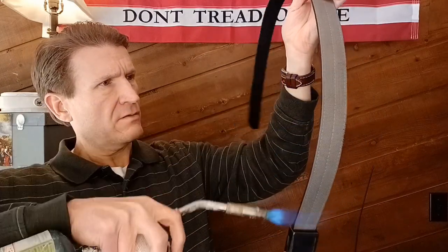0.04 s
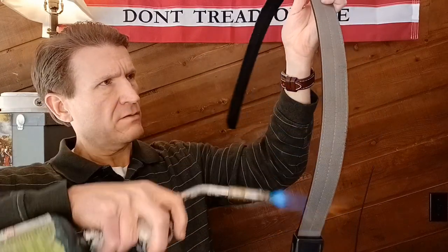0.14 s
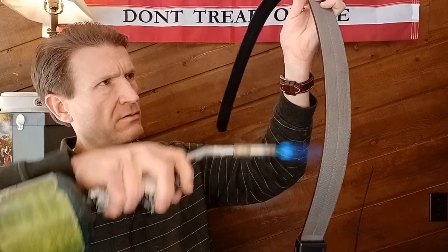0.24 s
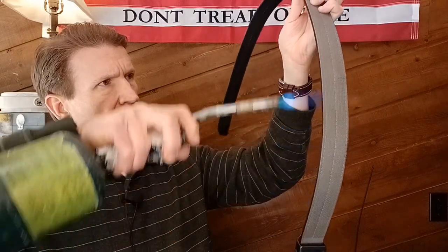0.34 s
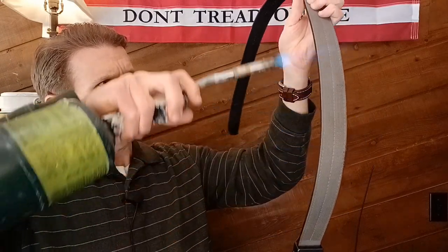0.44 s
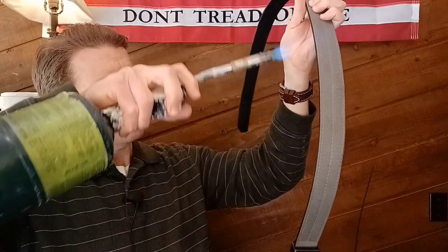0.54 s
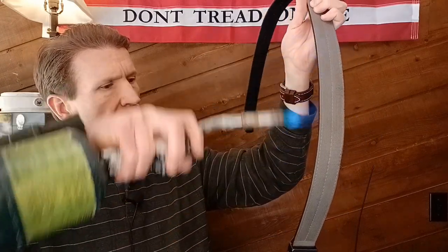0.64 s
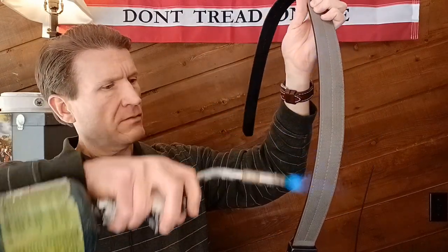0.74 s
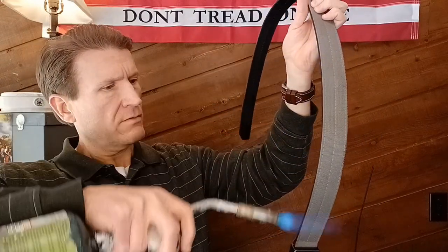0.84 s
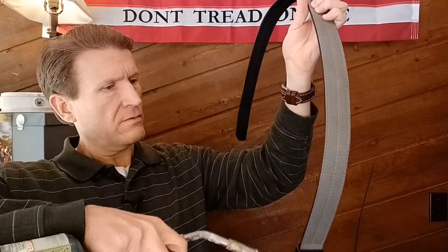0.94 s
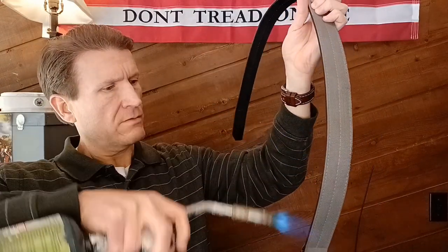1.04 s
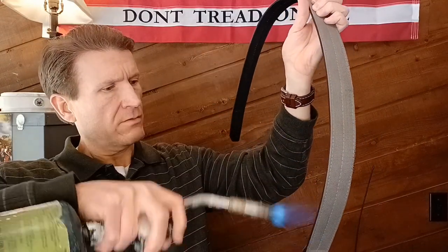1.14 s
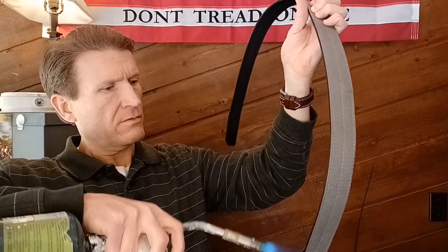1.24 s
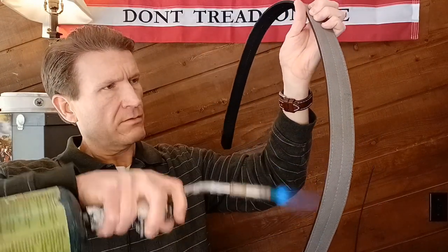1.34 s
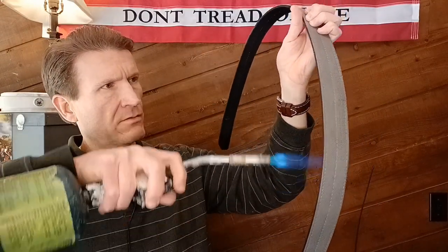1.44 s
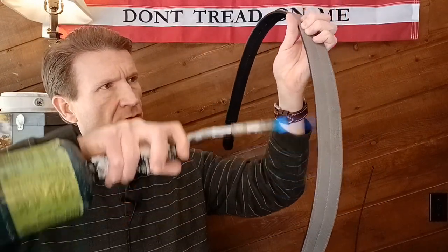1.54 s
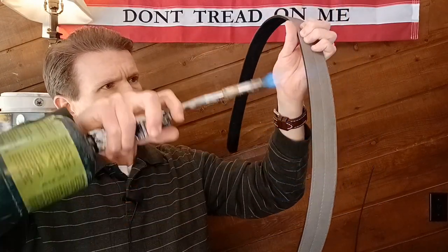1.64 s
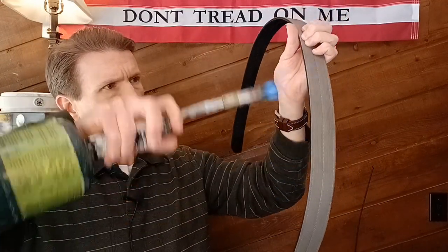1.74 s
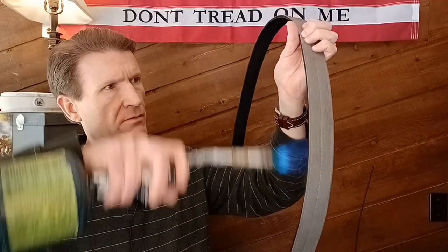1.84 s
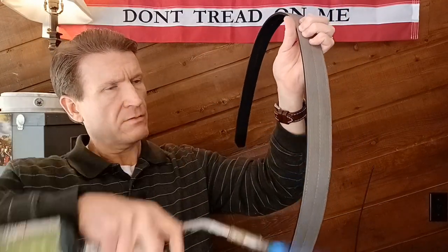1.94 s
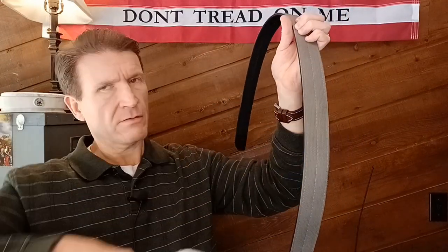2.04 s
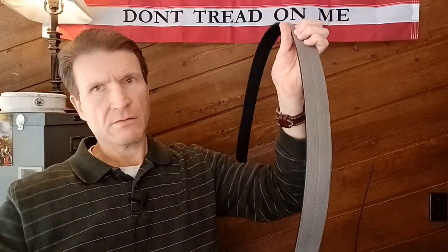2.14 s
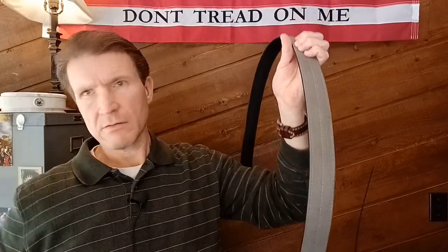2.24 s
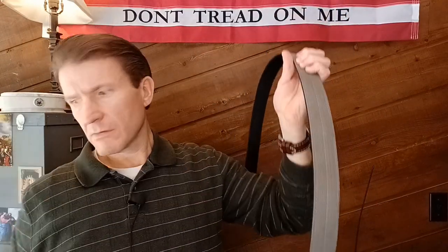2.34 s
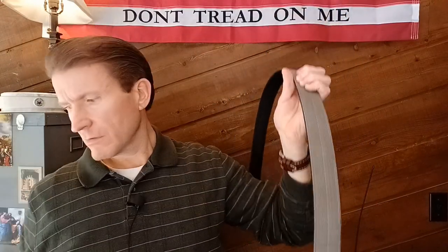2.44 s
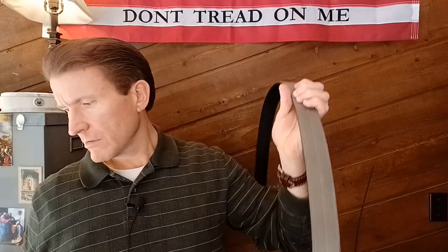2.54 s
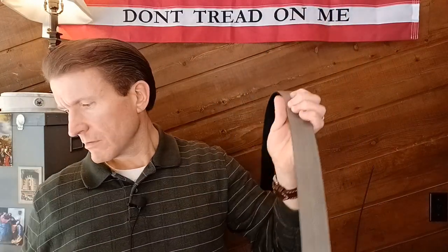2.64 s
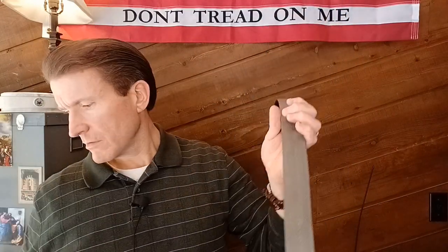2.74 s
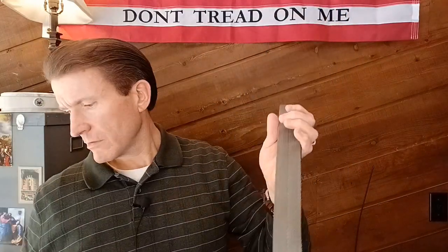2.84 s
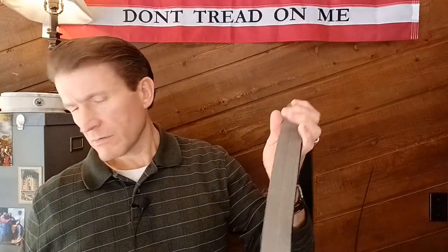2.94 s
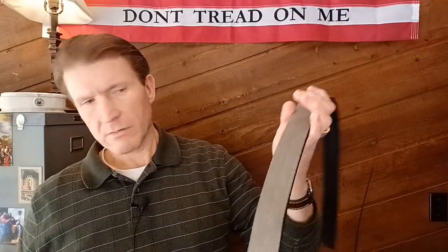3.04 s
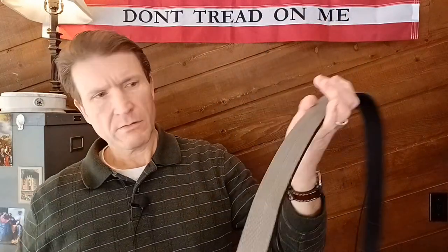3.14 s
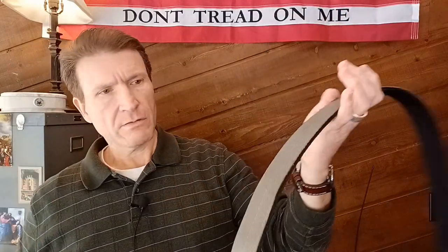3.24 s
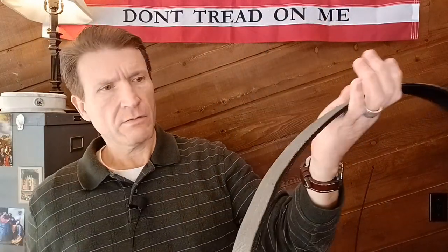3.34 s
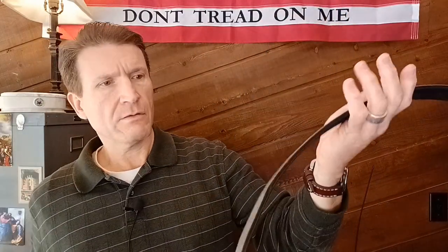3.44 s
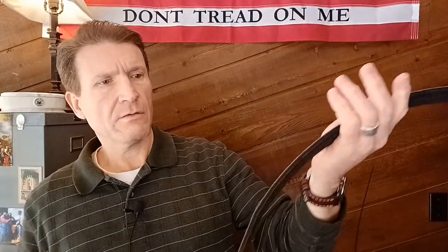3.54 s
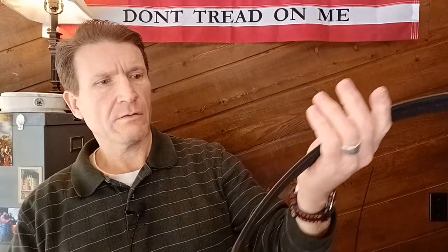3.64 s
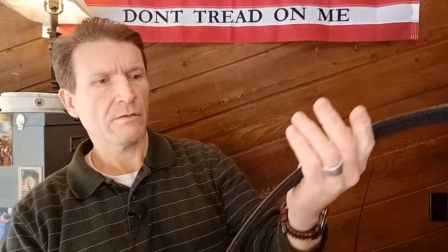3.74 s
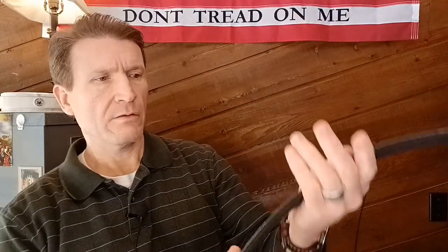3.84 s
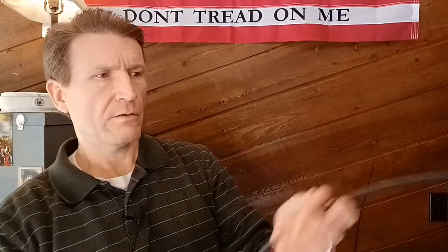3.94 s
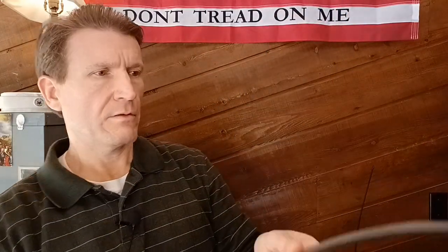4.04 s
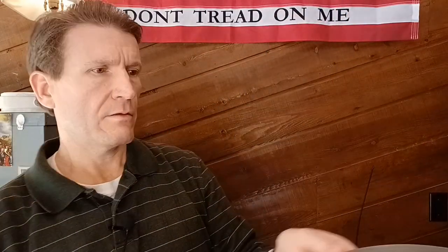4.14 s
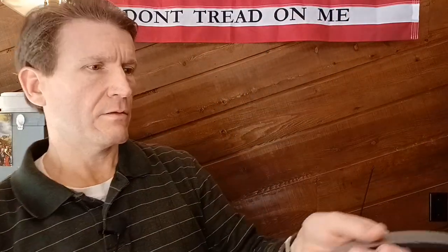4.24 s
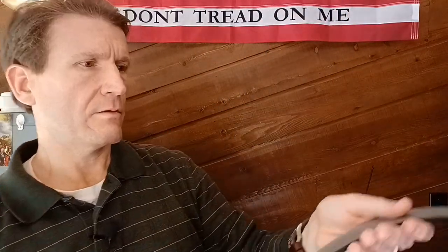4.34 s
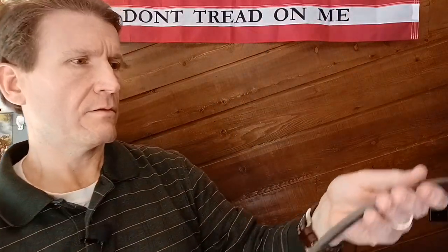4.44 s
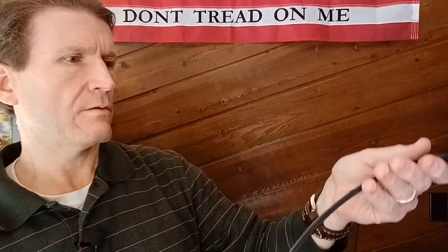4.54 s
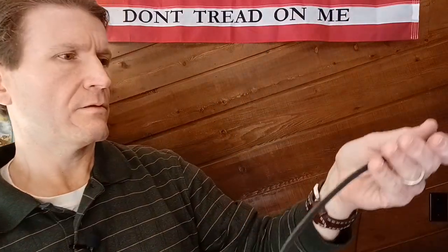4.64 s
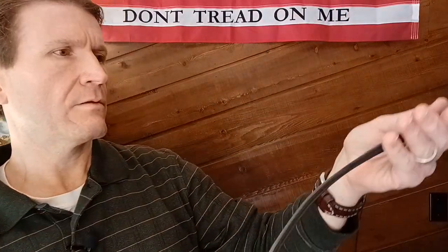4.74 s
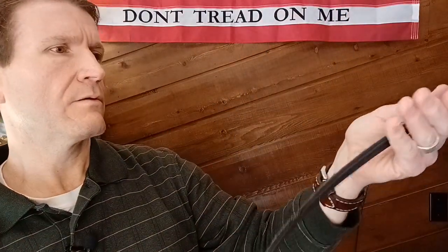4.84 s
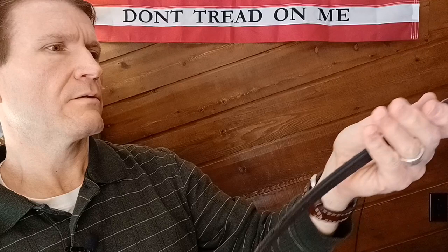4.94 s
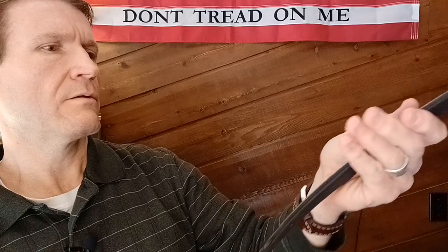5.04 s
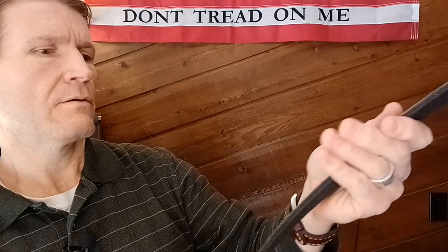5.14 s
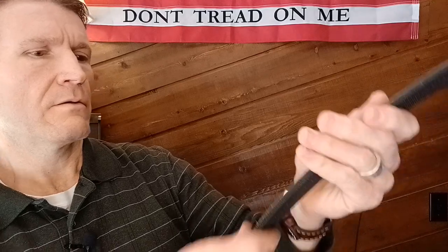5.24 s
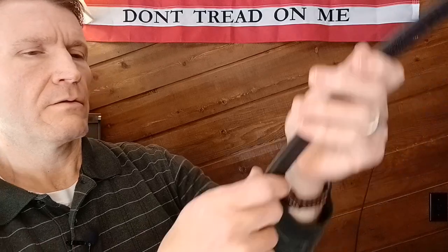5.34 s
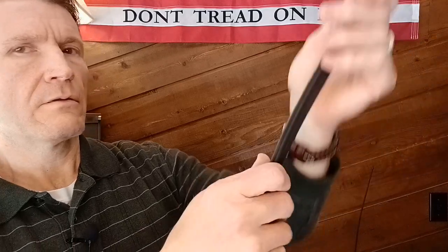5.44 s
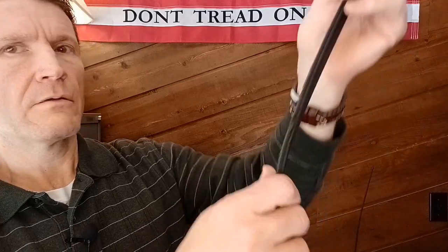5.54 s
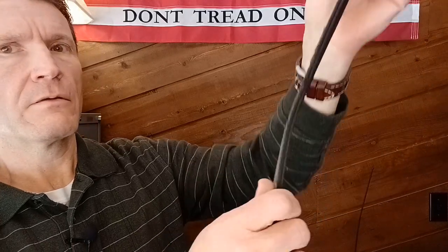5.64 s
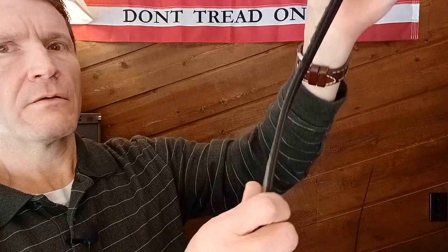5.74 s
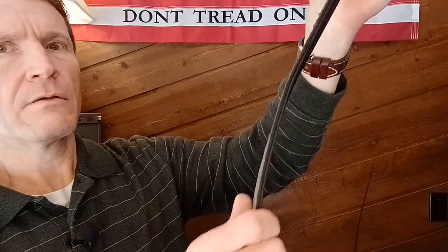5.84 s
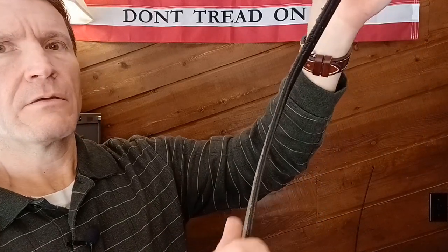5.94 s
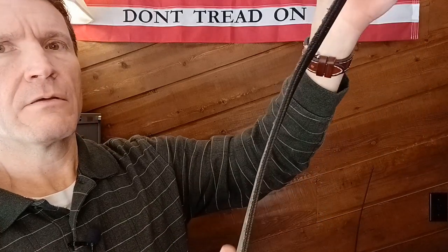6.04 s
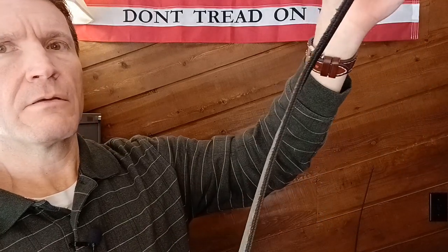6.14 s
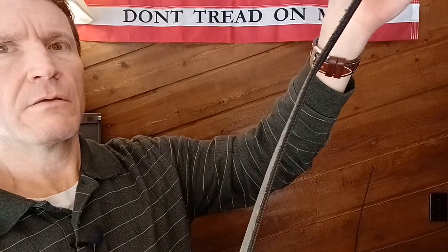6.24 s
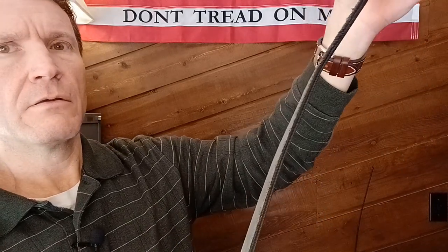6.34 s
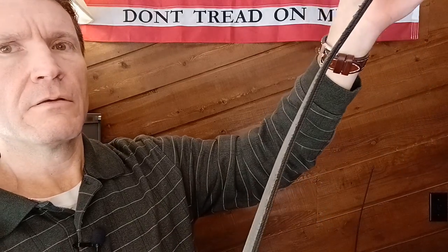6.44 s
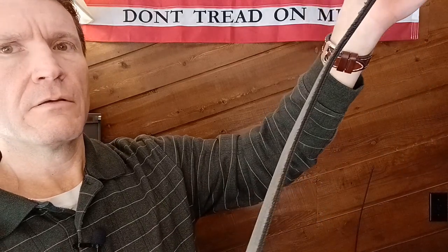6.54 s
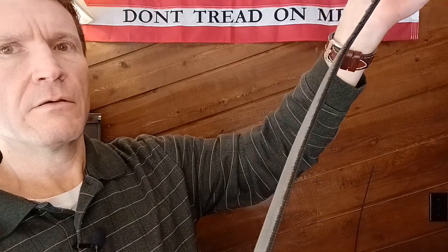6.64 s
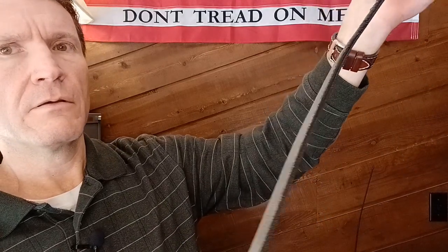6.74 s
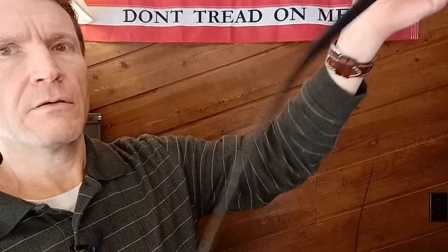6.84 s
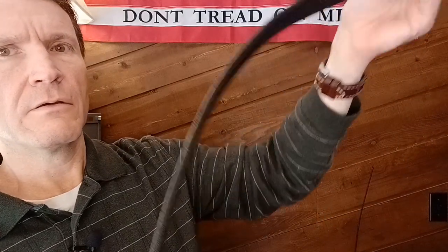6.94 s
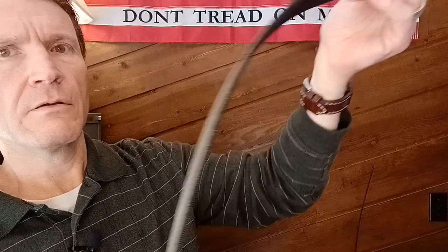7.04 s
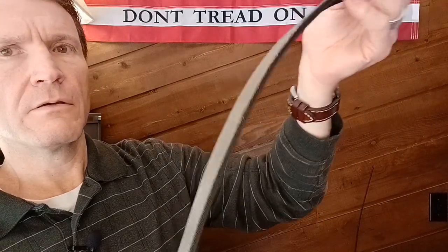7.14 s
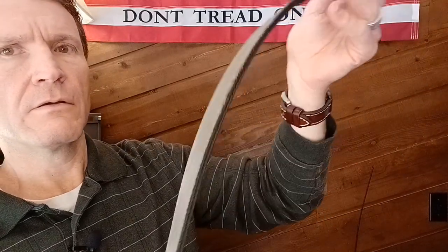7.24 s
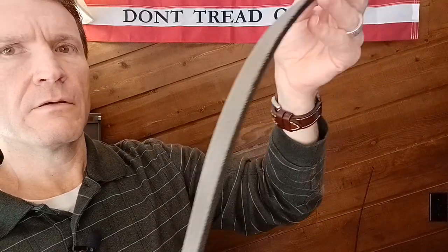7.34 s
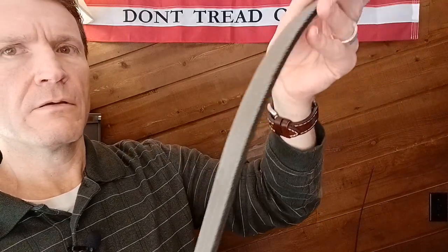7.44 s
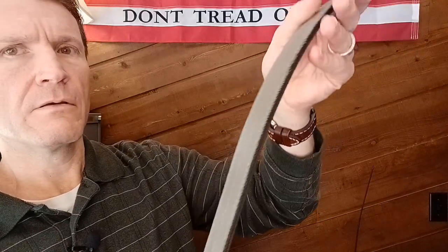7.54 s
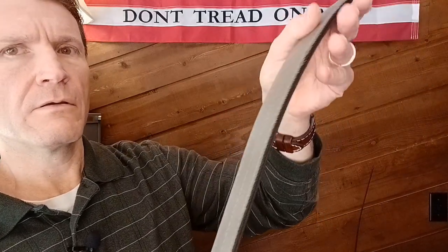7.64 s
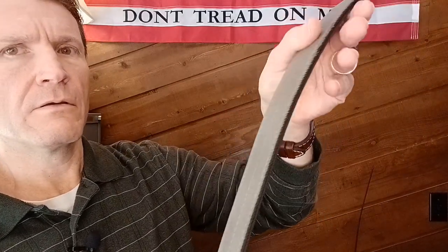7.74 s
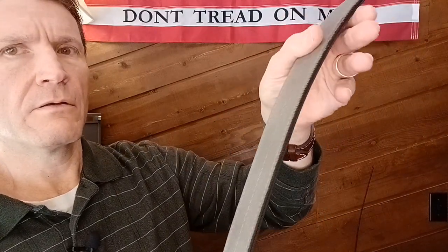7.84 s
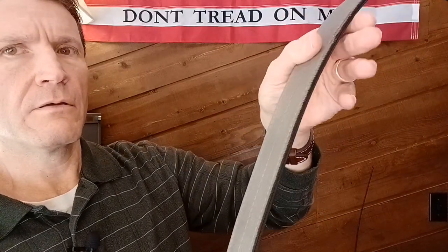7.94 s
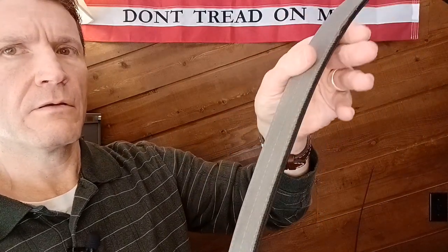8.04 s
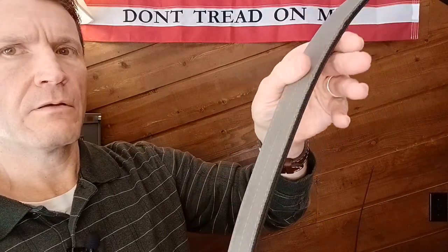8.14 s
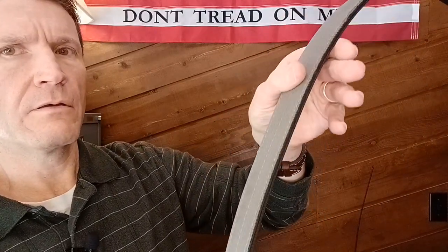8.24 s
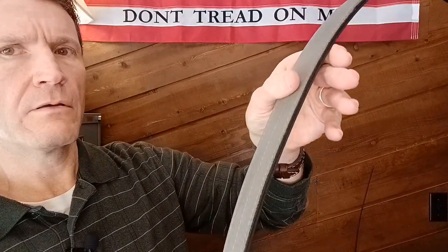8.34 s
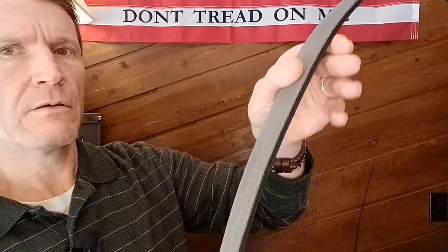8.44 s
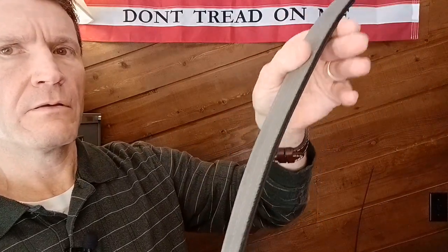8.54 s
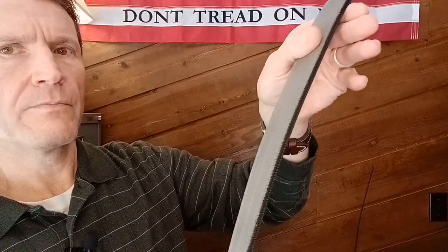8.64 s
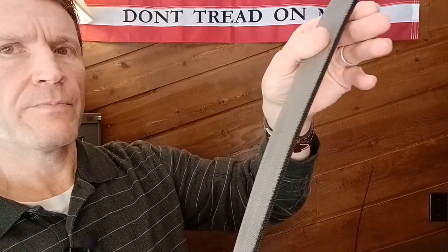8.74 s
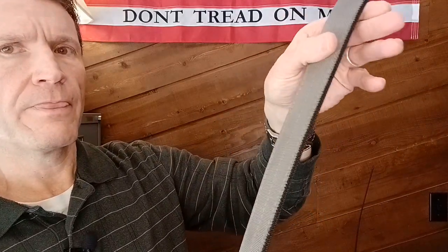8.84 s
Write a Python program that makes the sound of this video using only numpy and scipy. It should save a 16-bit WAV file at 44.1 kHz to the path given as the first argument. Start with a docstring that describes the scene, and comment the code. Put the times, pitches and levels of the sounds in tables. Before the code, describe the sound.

Close up indoors, a handheld torch burns for two seconds, its steel bottle clunks down, and fingers rub nylon webbing in rasping strokes.

```python
"""A handheld gas torch sweeps up and down a nylon strap in a small wood-panelled room, heard close up.
Turbulent combustion roars and drives the burner tube; the gas jet hisses until the valve shuts.
The steel bottle bumps once and is set down, thudding and ringing. Hands then slide along the webbing
in long strokes, skin slipping on the threads. Small ticks and a ping of touched metal sound over
quiet room noise, a thin electrical whine and the soft rumble of a turning body."""
import sys
import numpy as np
from scipy import signal
from scipy.fft import rfft, irfft, next_fast_len
from scipy.io import wavfile
from scipy.ndimage import uniform_filter1d, map_coordinates

SR = 44100
rng = np.random.default_rng(int(sys.argv[2]) if len(sys.argv) > 2 else 0)


def unload_audio(sound):
    """Save the sound as a 16-bit wav file, at the path given as the first command line argument."""
    columns = np.transpose(np.atleast_2d(sound))
    # keep every value between -1 and 1, then stretch to whole-number steps
    steps = np.round(np.clip(columns, -1, 1) * 32767)
    wavfile.write(sys.argv[1], SR, steps.astype(np.int16))


N = 391600

# Torch swings. Each row: time in seconds, body echo lag in seconds, hand echo lag in seconds,
# notch centre in Hz, jet level offset in dB.
TORCH_SWINGS = [(0, 0.00066, 0.00063, 5420, -0.5), (.15, 0.00068, 0.00063, 5900, 2.5),
                (.3, 0.00054, 0.00055, 5970, -0.2), (.42, 0.00035, 0.00054, 7600, 0.5),
                (.56, 0.00024, 0.00045, 8400, -0.5), (.72, 0.00041, 0.00049, 7700, 0.5),
                (.87, 0.00058, 0.00062, 6620, -0.3), (1.02, 0.00067, 0.00071, 6140, 1.5),
                (1.17, 0.00074, 0.00071, 6310, 0), (1.35, 0.00055, 0.00063, 6500, 1.5),
                (1.47, .000523, .000569, 7400, -0.5), (1.6, 0.00043, 0.00052, 8300, .5),
                (1.75, 0.0002, 0.00046, 9000, 1.5), (1.9, 0.00068, 0.00058, 8000, 0.4),
                (2.03, 0.00078, 0.00085, 6200, -0.5)]
# Wavering burner tube resonance. Each row: time in seconds, centre in Hz, relative level in dB.
TUBE_RESONANCE = [(0, 615, -20.5), (.21, 590, -19), (.26, 565, -11.5), (.31, 585, -19), (.45, 665, -19.5),
                  (.51, 560, -13), (.6, 600, -22), (.65, 690, -20.5), (.77, 665, -24.5), (.88, 735, -16),
                  (1.0, 715, -17.5), (1.08, 660, -14.5), (1.15, 555, -18), (1.22, 620, -20.5),
                  (1.33, 620, -18.5), (1.43, 565, -17.5), (1.57, 630, -22), (1.65, 555, -23.5),
                  (1.73, 630, -22), (1.85, 575, -25), (2.02, 585, -23.5)]
# Combustion noise and gas jet. Each row: frequency in Hz, relative density in dB.
FLAME_SPECTRUM = [(25, -62), (50, -35), (80, -20), (115, -5.5), (160, -8), (250, -2), (430, -1.5),
                  (540, 3.5), (700, -0.5), (860, 0.5), (1100, -6.5), (2000, -8.5), (2300, -13.5),
                  (2550, -23), (2850, -19), (3350, -20), (3700, -30.5), (8000, -59)]
JET_SPECTRUM = [(1500, -28), (3750, -10.5), (4300, -2.5), (4750, -3.5), (5250, -0.5), (5900, -3.5),
                (7200, -1), (9600, 0), (11000, -4), (13000, -11), (16000, -18)]

# Hand strokes on the webbing. Each row: start, end and attack in seconds; mid-stroke levels of fibre
# hiss, skin rasp, edge scrape and dull rub in dB; swell in dB/s; grip, scrape and hiss centres in Hz.
HAND_STROKES = [ (2.4, 2.90, 0.091, -78, -83, -92, -72, 2, 2141, 6003, 9566),
                (3.34, 3.861, .03, -69, -85, -80.5, -86, 8.5, 2490, 6000, 9040),
                (3.473, 3.579, .05, -56.5, -77.5, -70, -75.5, -4, 2603, 5500, 8190),
                (3.808, 3.93, .05, -46.5, -56, -48, -62, 25.5, 2100, 5612, 8300),
                (3.89, 4.0, .035, -43.5, -56.5, -53.5, -58.5, -0.5, 2200, 7070, 9200),
                (3.96, 4.083, .045, -40, -48.5, -43.5, -53, 19, 2194, 7070, 8840),
                (4.094, 4.443, 0.091, -41.5, -39, -53, -53.5, -32, 2308, 5400, 9230),
                (4.351, 4.62, 0.087, -42, -41, -53.5, -58.5, -1, 2456, 7280, 8690),
                (4.529, 4.912, .09, -41.5, -46, -55.5, -59, 13.5, 2550, 6600, 9230),
                (4.836, 5.04, 0.032, -76.5, -68, -73.5, -61.5, -24.5, 2630, 7600, 10350),
                (4.99, 5.129, .04, -37, -45, -46, -59.5, 50, 2558, 3960, 9720),
                (5.06, 5.235, .06, -31, -37.5, -38.5, -55, 35, 3160, 6245, 9400),
                (5.182, 5.28, .035, -27, -40.5, -33, -55, -49, 2750, 4665, 8506),
                (5.202, 5.385, 0.05, -36, -43.5, -47, -53.5, -115, 1600, 6354, 8800),
                (5.393, 5.6, 0.092, -42, -52.5, -46, -54, -0.5, 1850, 7330, 9910),
                (5.52, 5.759, 0.048, -47, -52.5, -52, -52.5, -36.5, 1850, 7330, 9900),
                (5.671, 5.958, .05, -50.5, -62, -60, -61.5, -14.5, 1900, 5927, 8760),
                (5.8, 6.557, 0.17, -53, -53.5, -61, -61, 0, 2069, 6830, 8690),
                (6.363, 6.819, .17, -48, -56, -57.5, -67, -5, 1961, 5280, 9555),
                (6.87, 6.99, 0.049, -58.5, -68.5, -65.5, -75, 28, 2233, 3555, 9280),
                (6.909, 7.235, .13, -51.5, -63, -60.5, -65.5, -6, 2063, 3940, 9800),
                (7.255, 7.577, .1, -56.5, -62.5, -68, -72, -44.5, 1900, 6400, 9400),
                (7.489, 7.993, .13, -60, -77, -78, -96, -29, 2194, 6500, 9320),
                (7.9, 8.23, 0.1206, -60, -78.5, -72, -94, -25, 2400, 6800, 9450),
                (8.162, 8.453, .09, -60, -79.5, -70.5, -85, -29, 2375, 6800, 9530),
                (8.541, 8.95, 0.039, -63.5, -69, -69, -70.5, -20.5, 2066, 5700, 7620)]
# Hand closure round the strap. Each row: time in seconds, cupping from 0 (open) to 1 (closed).
HAND_CUPPING = [(3.8, 0.4), (4.2, .1), (4.7, 0.4), (5.2, 0.15), (5.6, 0.1), (5.9, 0.8), (6.4, 1), (6.7, 0),
                (7.1, 0.16), (7.9, 0.58), (8.65, .95)]
# Bands cancelled by bounces off palm and fingers. Each row: centre as a ratio to the grip resonance,
# width in Hz, open depth and cupped depth from 0 to 1.
PALM_NOTCHES = [(1.44, 460, .1, .75), (2.08, 750, .55, .7)]
# Skin rasp, edge scrape, fibre hiss, soft strap body. Each row: frequency in Hz, relative density in dB.
SKIN_SPECTRUM = [(100, -60), (500, -23), (1200, -3.5), (2200, 7), (2800, 6.5), (3400, 4), (4200, -2),
                 (7000, -36.5)]
EDGE_SPECTRUM = [(300, -88), (2500, -34), (3500, -4), (4500, -0.5), (5300, 0.5), (6400, -5.5), (7500, -7),
                 (10000, -31.5)]
FIBRE_SPECTRUM = [(300, -67), (3000, -13), (4500, -16.5), (6000, -7), (7200, -3.5), (8500, -0.5), (9700, 1),
                  (11000, -2), (13000, -7.5), (16000, -16.5)]
STRAP_SPECTRUM = [(25, -62), (60, -35), (120, -11), (200, 2), (400, 0.5), (700, -2.5), (1100, -0.5),
                  (1600, -4), (3000, -27.5)]

# The bottle bumps, lands and rocks. Each row: start in seconds; thud, ring and clatter levels in dB;
# ring cutoff in Hz.
BOTTLE_KNOCKS = [(2.438, -36.5, -50, -76, 6000), (2.451, -59, -49, -82, 1800), (2.463, -52, -48, -85, 1700),
                 (2.882, -22.5, -55, -37, 5500), (2.894, -23.5, -52, -51, 2600),
                 (2.906, -26, -56, -52, 1500), (2.923, -34, -60, -58, 1190), (2.94, -34, -62, -61, 1000)]
# Steel shell modes. Each row: frequency in Hz, relative level in dB, T60 in seconds.
BOTTLE_MODES = [(1244, -2, 0.15), (1320, -1.5, 0.14), (1400, -10, 0.087), (2380, -10, 0.045),
                (2576, -1, 0.046), (3490, -10, 0.058), (3580, -12, 0.067)]
# Struck surface and rattling fittings. Each row: frequency in Hz, relative density in dB.
THUD_SPECTRUM = [(25, -52), (60, -9), (110, 8.5), (200, 4), (300, 3.5), (460, 4), (600, -7), (760, -11.5),
                 (880, -7), (1130, -6), (1320, -26), (3000, -48.5), (16000, -90)]
CLATTER_SPECTRUM = [(500, 9), (1400, 1.5), (2500, 2), (4400, -4.5), (6500, -9), (10000, -4.5), (12000, -21),
                    (16000, -46)]

# Ticks of valve, strap and fingers. Each row: start in seconds, dry peak in dB, band centre in Hz.
DRY_TICKS = [(2.314, -46, 7040), (2.332, -45, 1200), (2.676, -53, 7880), (3.359, -41.5, 5550),
             (3.676, -59, 8100), (3.826, -44, 6050), (5.097, -31.5, 7198), (5.221, -23.5, 7860),
             (8.527, -41, 6020)]
# Light touches on a small piece of metal. Each row: start in seconds, level in dB.
METAL_TOUCHES = [(5.704, -46.5), (5.726, -39.5)]
# Soft thump of the strap and thin ring of the touched metal.
# Each row: frequency in Hz, relative level in dB, T60 in seconds.
THUMP_AND_RING_MODES = [(400, -9, .05), (510, -8, .06), (5780, -8, 0.15), (8300, -10, 0.037),
                        (11920, 1, 0.15), (12340, -15, .12)]

# Body turns. Each row: peak time in seconds, peak level in dB, rise and fall in dB/s.
BODY_TURNS = [(3.13, -56, 170), (3.62, -63.5, 31.5)]
# Turning body and quiet room. Each row: frequency in Hz, relative density in dB.
RUMBLE_SPECTRUM = [(30, -33), (70, -6.5), (110, 6.5), (150, -2.5), (260, -19.5), (500, -37), (2000, -72.5)]
AIR_SPECTRUM = [(25, -26.5), (60, -17), (90, -12), (120, 0), (160, -9.5), (220, 7), (330, 1), (600, -9),
                (820, -6.5), (1300, -23), (3500, -30), (9500, -19), (12000, -32), (16000, -32.5)]
# Decay of the panelled room. Each row: frequency in Hz, T60 in seconds.
ROOM_DECAY = [(80, 0.26), (210, 0.31), (560, 0.29), (1500, 0.31), (4000, 0.32), (10000, 0.19)]

TOP_HZ = 15800


def torch(off_s=2.042, flame_fade_s=0.015, jet_fade_s=0.025, recede_db_per_s=0.5):
    """Flame and jet recede as the torch drifts away; at shut-off the flame dies before the last gas."""
    t = np.arange(N) / SR
    shut_s = np.maximum(t - off_s, 0)
    body_lag_s, hand_lag_s, notch_hz, jet_offset_db = curves(TORCH_SWINGS)
    burn = flame(lit=t < off_s) * np.exp(-shut_s / flame_fade_s)
    burn += gas_jet(jet_offset_db) * np.exp(-shut_s / jet_fade_s)
    heard = room(amp(-recede_db_per_s * t) * burn, wet_db=-11, tails=20)
    return swing_filter(heard, body_lag_s, hand_lag_s, notch_hz)


def flame(lit, level_db=-19, flutter_db=1.0, tube_mean_db=-3.5, tube_swing=0.86, jitter_hz=14):
    """Turbulent combustion roars and drives the burner tube's resonance."""
    tube_hz, drive_db = curves(TUBE_RESONANCE)
    tube_db = tube_mean_db + tube_swing * (drive_db - drive_db[lit].mean())
    eddies = rng.standard_normal(N) + 1j * rng.standard_normal(N)
    tube = amp(tube_db) * gliding(eddies, tube_hz + jitter_hz * wobble(60), width_hz=50)
    return amp(level_db + flutter_db * wobble(45)) * (noise(FLAME_SPECTRUM) + tube)


def gas_jet(offset_db, level_db=-32, flutter_db=0.86):
    """Escaping gas hisses, flickering in level and colour."""
    gain = amp(level_db + offset_db + flutter_db * wobble(30))
    return gain * patchy(noise(JET_SPECTRUM), depth_db=0.78)


def swing_filter(x, body_lag_s, hand_lag_s, notch_hz):
    """Moving echoes off clothed body and hand comb the treble; a notch slides as the nozzle tilts."""
    body_echo = 0.48 * echoed(x, body_lag_s, top_hz=3000)
    hand_echo = -0.19 * echoed(x, hand_lag_s, top_hz=11000)
    return notched(x + body_echo + hand_echo, notch_hz, width_hz=1300, depth=0.45)


def webbing(weave_db=1.2, unsteady_db=1.27, cup_muffle_db=5):
    """Thread slips hiss, scrape on the edge, rasp in the hollow of the hand and shake the strap."""
    columns = np.transpose(HAND_STROKES)
    start_s, end_s, attack_s = columns[:3]
    hiss_db, rasp_db, edge_db, dull_db, swell_db_per_s, grip_hz, edge_hz, hiss_hz = columns[3:]
    powers = np.array([stroke(*row) ** 2 for row in zip(start_s, end_s, attack_s, swell_db_per_s)])
    cup, = curves(HAND_CUPPING)
    skin_db = 0.5 - cup_muffle_db * cup
    rasp, hollow_hz = friction(powers, rasp_db, grip_hz, SKIN_SPECTRUM, width_hz=700, broad_db=skin_db)
    edge, _ = friction(powers, edge_db, edge_hz, EDGE_SPECTRUM, width_hz=1100, broad_db=-0.5, order=2)
    hiss, _ = friction(powers, hiss_db, hiss_hz, FIBRE_SPECTRUM, width_hz=2700, broad_db=1.5)
    dull = np.sqrt(amp(dull_db) ** 2 @ powers) * noise(STRAP_SPECTRUM)
    rub = rasp + edge + hiss + dull
    for ratio, width_hz, open_depth, cupped_depth in PALM_NOTCHES:
        depth = open_depth + cup * (cupped_depth - open_depth)
        rub = notched(rub, ratio * hollow_hz, width_hz, depth)
    rub = np.std(rub) * patchy(rub, depth_db=1.7)  # shifting fingers recolour the slips
    flutter = amp(weave_db * wobble(220) + unsteady_db * wobble(35))
    return room(rub * flutter, wet_db=-11)


def stroke(start_s, end_s, attack_s, swell_db_per_s, release_s=0.065):
    """Gain of one push: the hand gathers speed, presses on or eases off, and stops."""
    t = np.arange(N) / SR
    on = (t > start_s) & (t < end_s)
    ramp = np.clip((t[on] - start_s) / attack_s, 0, 1) * np.clip((end_s - t[on]) / release_s, 0, 1)
    swell = amp(swell_db_per_s * (t[on] - (start_s + end_s) / 2))
    gain = np.zeros(N)
    gain[on] = np.sin(np.pi / 2 * ramp) ** 2 * swell
    return gain


def friction(powers, levels_db, centres_hz, spectrum, width_hz, broad_db, order=3):
    """Slips drive a resonance gliding between strokes, over a broad rustle. Returns sound and centre."""
    weights = amp(levels_db) ** 2
    power = weights @ powers
    moving = np.flatnonzero(power)
    mean_hz = ((weights * centres_hz) @ powers)[moving] / power[moving]
    centre_hz = np.interp(np.arange(N), moving, mean_hz)
    resonance = gliding(slips() + 1j * slips(), centre_hz, width_hz, order)
    rustle = amp(broad_db) * colour(slips(), spectrum)
    return np.sqrt(power) * unit(resonance + rustle), centre_hz


def slips(rate_per_s=14000, spread_db=2):
    """Skin catches on threads: random impulses of uneven size, at rms 1."""
    sizes = rng.standard_normal(N) * amp(spread_db * rng.standard_normal(N))
    return unit(sizes * (rng.random(N) < rate_per_s / SR))


def bottle(thud_t60_s=0.081, clatter_t60_s=0.22, contact_s=0.0007,
           hum_hz=1367, hum_db=-59, hum_t60_s=0.82):
    """Each contact thuds on the surface, rings the steel bottle and rattles its fittings."""
    out, t = np.zeros(N), np.arange(SR) / SR
    thuds, rattles = noise(THUD_SPECTRUM), noise(CLATTER_SPECTRUM)
    onset = 1 - np.exp(-t / contact_s)  # the surface gives way
    for start_s, thud_db, ring_db, clatter_db, cutoff_hz in BOTTLE_KNOCKS:
        span = slice(round(start_s * SR), round(start_s * SR) + SR)
        thud = amp(thud_db - 60 * t / thud_t60_s) * thuds[span]
        clatter = amp(clatter_db - 60 * t / clatter_t60_s) * rattles[span]
        shell = amp(ring_db) * ring(BOTTLE_MODES, cutoff_hz)
        add(out, start_s, (thud + clatter) * onset + shell)
    out = room(out, wet_db=-6)
    # standing free, the shell rings on in one mode
    last_contact_s = BOTTLE_KNOCKS[-1][0]
    add(out, last_contact_s, ring([(hum_hz, hum_db, hum_t60_s)]))
    return out


def ticks(t60_s=0.009):
    """Small contacts of valve, strap and fingers: short bursts of band-passed noise."""
    out, t = np.zeros(N), np.arange(SR // 10) / SR
    for start_s, peak_db, hz in DRY_TICKS:
        band = signal.butter(2, [hz / 2, min(hz * 2, TOP_HZ)], "band", fs=SR, output="sos")
        tick = signal.sosfilt(band, rng.standard_normal(len(t)) * amp(-60 * t / t60_s))
        add(out, start_s, amp(peak_db) * tick / np.abs(tick).max())
    return out


def metal_touches():
    """At each light touch the strap thumps softly and a small piece of metal rings."""
    out = np.zeros(N)
    for start_s, level_db in METAL_TOUCHES:
        add(out, start_s, amp(level_db) * ring(THUMP_AND_RING_MODES))
    return out


def body_rumble():
    """A soft rumble swells and fades as the body turns back."""
    t = np.arange(N) / SR
    gain = sum(amp(db - db_per_s * np.abs(t - peak_s)) for peak_s, db, db_per_s in BODY_TURNS)
    return gain * noise(RUMBLE_SPECTRUM)


def room_tone(air_db=-63, drift_db=0.37, whine_db=-80, whine_hz=15698):
    """Low room noise and a thin electrical whine."""
    t = np.arange(N) / SR
    air = amp(air_db + drift_db * wobble(2.3)) * noise(AIR_SPECTRUM)
    return air + amp(whine_db) * unit(np.sin(2 * np.pi * whine_hz * t))


def room(x, wet_db, tails=60, predelay_s=0.005):
    """Wooden walls reverberate; as things move, each stretch of x gets a new tail."""
    reverb, step = np.zeros(N), N // tails + 1
    for start in range(0, N, step):
        hz, t, bins = signal.stft(rng.standard_normal(SR // 3), SR, nperseg=256)
        decay = amp(-60 * t / along(ROOM_DECAY, hz)[:, None])
        tail = signal.istft(bins * decay, SR, nperseg=256)[1]
        wet = signal.fftconvolve(x[start:start + step], tail / np.linalg.norm(tail))
        add(reverb, start / SR + predelay_s, wet)
    return (x + amp(wet_db) * reverb) / np.hypot(1, amp(wet_db))


def ring(modes, cutoff_hz=np.inf, spread_db=2):
    """One second of decaying modes at random strengths; a soft contact barely excites the high ones."""
    out, t = np.zeros(SR), np.arange(SR) / SR
    for hz, db, t60_s in modes:
        envelope = amp(db + spread_db * rng.standard_normal() - 60 * t / t60_s)
        out += envelope / np.hypot(1, (hz / cutoff_hz) ** 3) * np.sin(2 * np.pi * hz * t)
    return out


def echoed(x, lag_s, top_hz, bend_hz=800):
    """Echo with a moving lag; long waves bend round the obstacle, short ones are absorbed."""
    bounced = filtered(x, lambda hz: hz ** 4 / (hz ** 4 + bend_hz ** 4) / (1 + (hz / top_hz) ** 2))
    return map_coordinates(bounced, [np.arange(N) - lag_s * SR], order=3)


def gliding(x, centre_hz, width_hz, order=2):
    """Moving resonance: x low-passed and shifted up to centre_hz, at rms 1."""
    baseband = signal.sosfilt(signal.butter(order, width_hz / 2, fs=SR, output="sos"), x)
    carrier = np.exp(2j * np.pi * np.cumsum(centre_hz) / SR)
    return unit(np.real(baseband * carrier))


def notched(x, centre_hz, width_hz, depth):
    """x with a moving band cut; depth 1 cancels its centre."""
    carrier = np.exp(2j * np.pi * np.cumsum(centre_hz) / SR)
    lowpass = signal.butter(1, width_hz / 2, fs=SR, output="sos")
    baseband = signal.sosfiltfilt(lowpass, x * np.conj(carrier))
    return x - 2 * np.clip(depth, 0, 1) * np.real(baseband * carrier)


def patchy(x, depth_db):
    """x with its colour drifting in random time-frequency patches, at rms 1."""
    bins = signal.stft(x, nperseg=256)[2]
    field = rng.standard_normal(bins.shape)
    for _ in range(2):
        field = uniform_filter1d(field, size=5, axis=0)
        field = uniform_filter1d(field, size=28, axis=1)
    return unit(signal.istft(bins * amp(depth_db * unit(field)), nperseg=256)[1][:N])


def noise(spectrum):
    """Coloured noise at rms 1."""
    return colour(rng.standard_normal(N), spectrum)


def colour(x, spectrum):
    """x shaped by a spectrum, at rms 1."""
    return unit(filtered(x, lambda hz: amp(along(spectrum, hz))))


def filtered(x, response):
    """x through a zero-phase frequency response."""
    size = next_fast_len(N + SR // 2)
    return irfft(rfft(x, size) * response(np.fft.rfftfreq(size, 1 / SR)), size)[:N]


def wobble(knots_per_s):
    """Smooth random curve."""
    knots = rng.standard_normal(int(N * knots_per_s / SR) + 4)
    return map_coordinates(knots, [np.arange(N) * knots_per_s / SR])


def curves(rows):
    """Each column after the time, interpolated per sample."""
    times_s, *columns = np.transpose(rows)
    return [np.interp(np.arange(N) / SR, times_s, column) for column in columns]


def along(points, hz):
    """(Hz, value) points interpolated on a log frequency axis."""
    points_hz, values = np.transpose(points)
    return np.interp(np.log(hz + 1), np.log(points_hz + 1), values)


def add(track, start_s, sound):
    """Mix a sound into a track in place."""
    part = track[round(start_s * SR):][:len(sound)]
    part += sound[:len(part)]


def amp(db):
    """Decibels to gain."""
    return 10 ** (np.asarray(db) / 20)


def unit(x):
    """x at rms 1."""
    return x / np.sqrt(np.mean(x ** 2) + 1e-20)


def scene():
    """Mono mix of all sources."""
    mix = torch() + bottle() + webbing()
    mix += room(ticks() + metal_touches(), wet_db=-5.5)
    return (mix + room_tone() + body_rumble())[None]


def record(dry):
    """Brick-wall low-pass at TOP_HZ."""
    return filtered(dry[0], lambda hz: hz < TOP_HZ)[None]


dry = scene()
out = record(dry)
unload_audio(out)
```